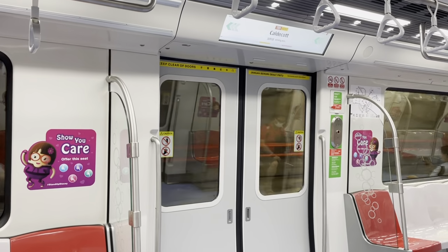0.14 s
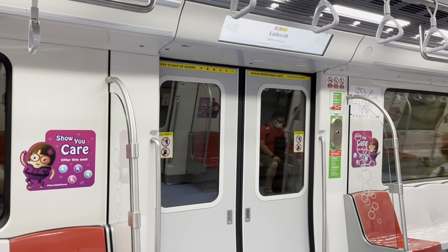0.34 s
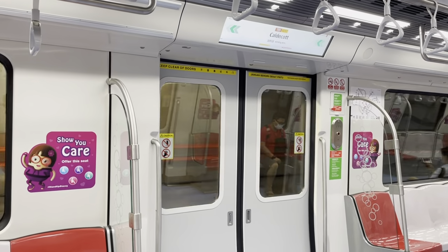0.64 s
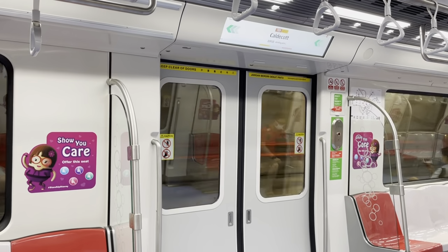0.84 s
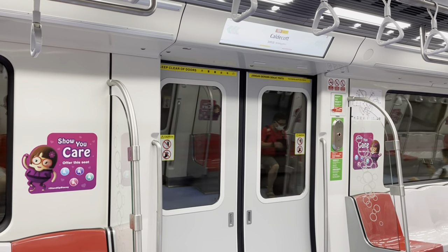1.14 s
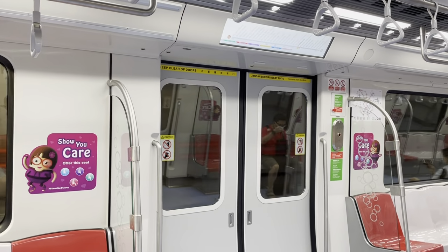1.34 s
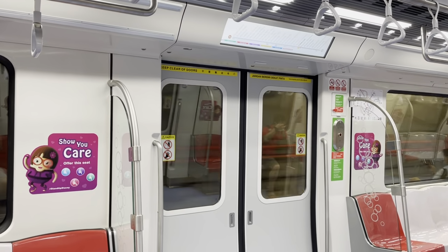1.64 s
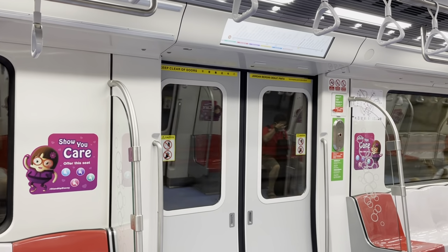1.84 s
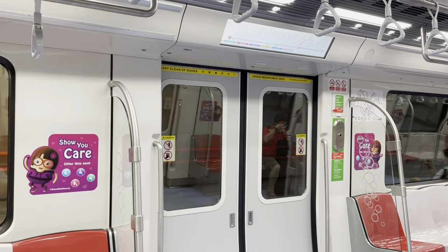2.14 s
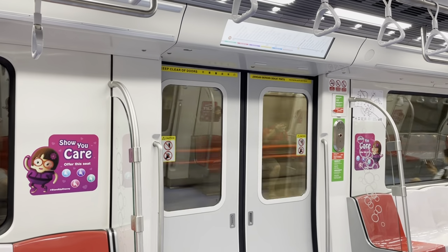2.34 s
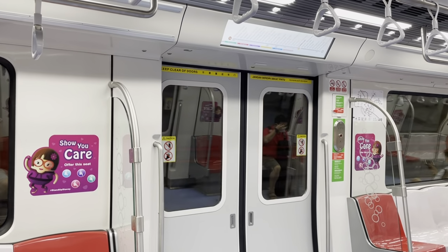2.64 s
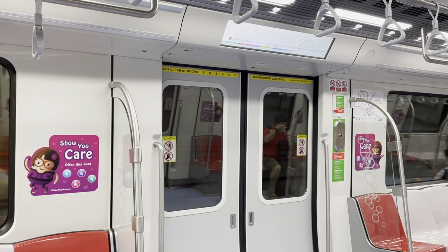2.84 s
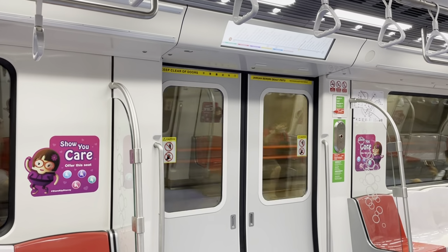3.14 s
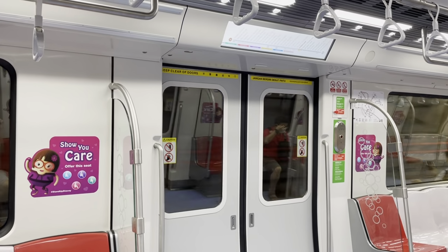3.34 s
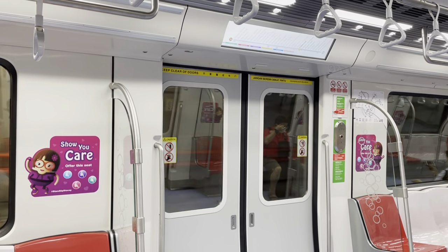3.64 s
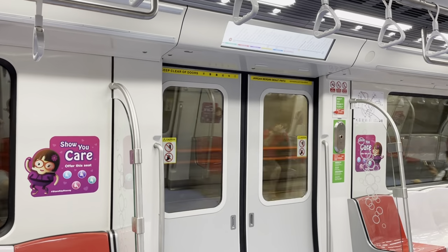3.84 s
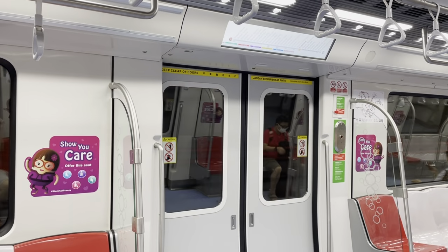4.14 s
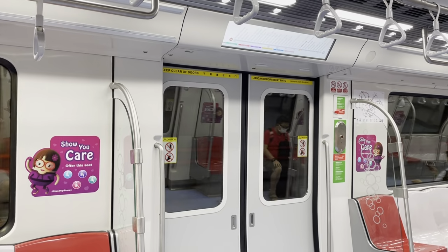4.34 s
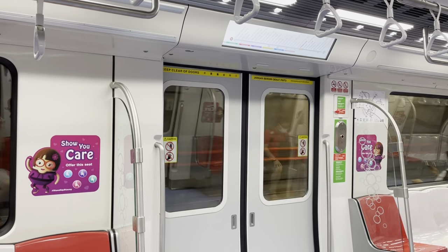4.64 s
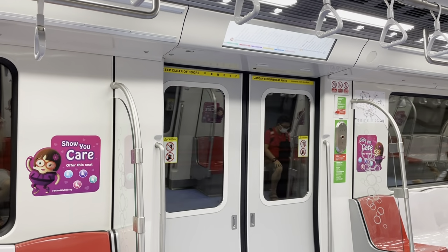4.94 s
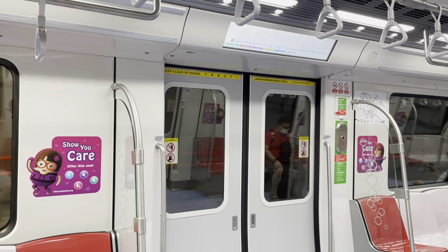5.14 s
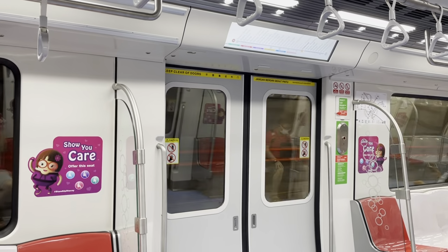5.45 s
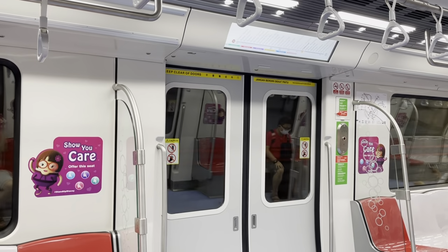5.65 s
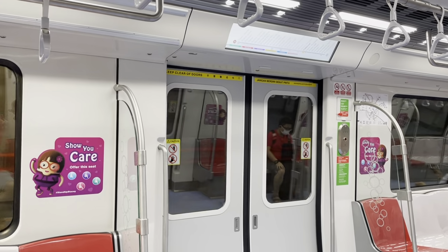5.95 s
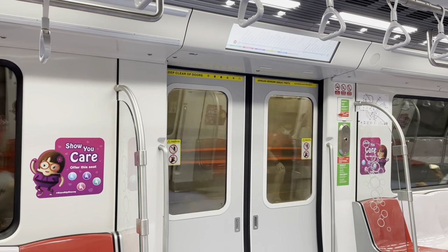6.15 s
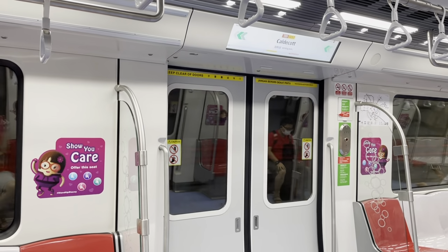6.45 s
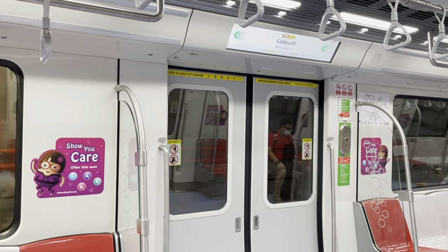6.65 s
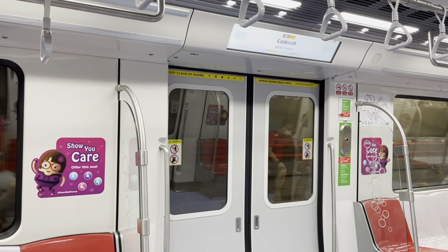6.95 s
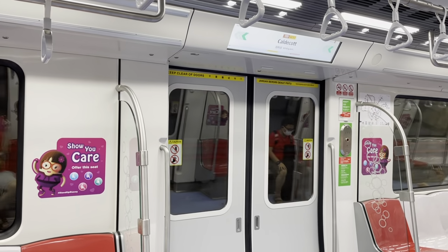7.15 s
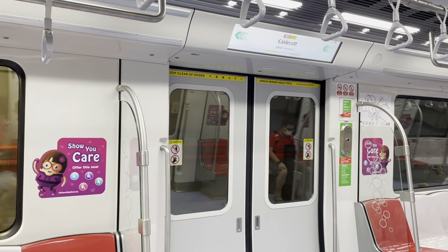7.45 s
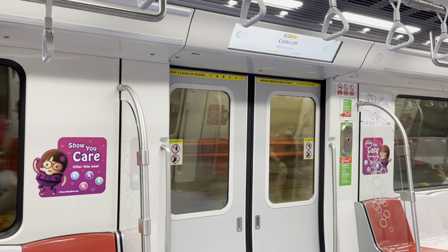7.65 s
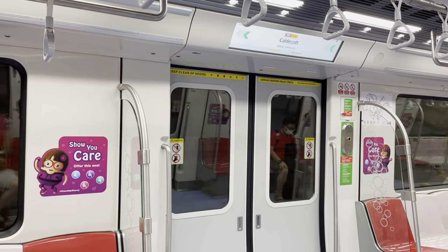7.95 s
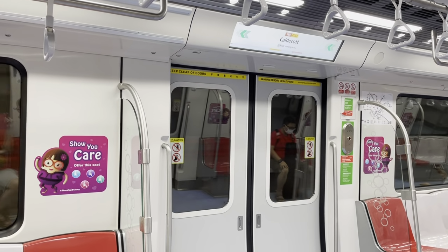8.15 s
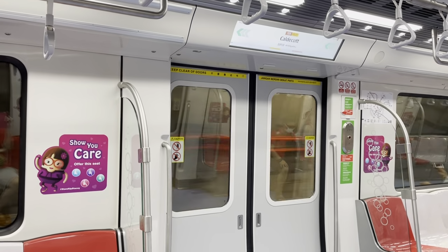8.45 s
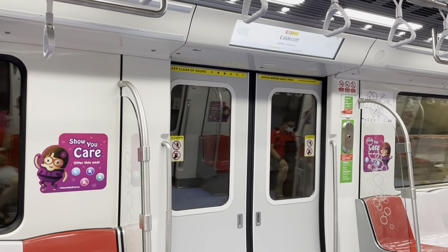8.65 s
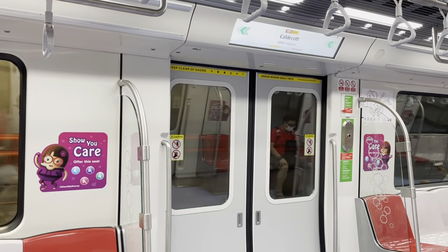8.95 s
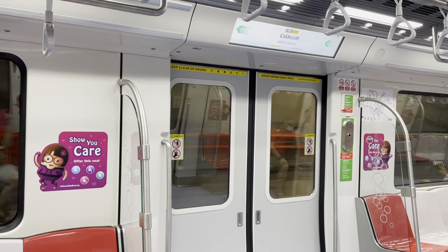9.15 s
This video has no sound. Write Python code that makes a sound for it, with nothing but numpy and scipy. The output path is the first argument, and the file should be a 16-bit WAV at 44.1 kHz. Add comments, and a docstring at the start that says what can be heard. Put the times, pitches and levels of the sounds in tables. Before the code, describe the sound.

Heard inside a metro car speeding through a tunnel, a continuous hollow rail roar dominates, with low wheel-frame rumble and body drone beneath. Soft air hisses at the door seals, and a faint high wheel ring swells now and then. Two faint air-valve puffs come before the middle. The roar eases slightly, then the floor hum swells late. Small stereo microphones in the cabin, wide and enclosed.

```python
"""Underground train ride

Inside an underground train car running at speed through a tunnel, heard by a small stereo microphone pair.
Rails roar, the bogies (wheel frames) rumble, the car body drones and the wheels ring: each is random noise
sent through resonances. Air hisses at the door seals and a valve puffs now and then: both are noise shaped
in pitch. Each sound has its own changing level.
"""
import sys
import numpy as np
from scipy import signal
from scipy.fft import rfft, irfft, next_fast_len
from scipy.io import wavfile
from scipy.ndimage import uniform_filter1d, map_coordinates

SR = 44100
rng = np.random.default_rng(int(sys.argv[2]) if len(sys.argv) > 2 else 0)


def volts_from_decibels(level):
    """Turn decibel levels (scalar or array-like) into linear amplitude factors."""
    exponent = np.asarray(level, float) / 20
    return 10 ** exponent


def unload_audio(sound):
    """Save the sound as a 16-bit wav file, at the path given as the first command line argument."""
    columns = np.transpose(np.atleast_2d(sound))
    # keep every value between -1 and 1, then stretch to whole-number steps
    steps = np.round(np.clip(columns, -1, 1) * 32767)
    wavfile.write(sys.argv[1], SR, steps.astype(np.int16))


N = 410394  # length in samples
TIME = np.arange(N) / SR  # seconds
HZ = np.fft.rfftfreq(next_fast_len(N + 8192), 1 / SR)  # pitches at which filters are given

# how loud the track runs under the wheels: (time [s], roar [dB], lowest rail band over the roar [dB])
ROAR_LEVELS = [(0, -20.5, -0.5), (.4, -22, -1.5), (1.1, -21.5, -2), (1.9, -23, -4), (2.4, -23, -1.5),
               (3.3, -24, -1.5), (4.4, -23, -3), (5.4, -24.5, -3.5), (6.5, -26, -3), (7.6, -24.5, -4.5),
               (8.3, -24, -4), (9.3, -24.5, -5)]
# how hard the floor is shaken from below: (time [s], shaking [dB])
SHAKING_LEVELS = [(0, -31), (.6, -34), (2, -34), (4, -33.5), (6.5, -34), (7.6, -31.5), (9.3, -33.5)]
# the floor panel's hum is uneven and swells late: (time [s], hum [dB])
HUM_LEVELS = [(0, -35.5), (1.5, -38), (3.2, -39), (5, -38), (7.1, -39.5), (7.8, -33.5), (8.7, -34.5),
              (9.3, -37)]

# Resonances of each part; resonant() narrows the widths, and the strengths only count within one table.
# rails, in three bands: (centre [Hz], width [Hz], strength [dB])
RAIL_LOW_MODES = [(583, 56, 2), (613, 88, -4), (668, 110, -1)]
RAIL_MID_MODES = [(761.6, 168, -1), (890, 187, -5.5)]
RAIL_HIGH_MODES = [(1032, 260, 0.29), (1258, 240, -0.7), (1401, 242, -0.8)]
# bogie: (centre [Hz], width [Hz], strength [dB])
BOGIE_MODES = [(47, 16, -7), (63, 22, -0.5), (85.8, 18, -3.5)]
# air in the cabin: (centre [Hz], width [Hz], strength [dB])
CABIN_MODES = [(116, 33, -3.5), (139.7, 22, 0.5), (163.6, 53, -4)]
# floor panel: (centre [Hz], width [Hz], strength [dB])
PANEL_MODES = [(244.6, 40, -10.5), (270.2, 21, -2)]
# low strand of the bogie that grows with the panel hum: (centre [Hz], width [Hz], strength [dB])
STRAND_MODES = [(81.3, 16, 0)]
# car body: (centre [Hz], width [Hz], strength [dB])
BODY_MODES = [(316.4, 66, -2), (407, 120, 0), (467, 127, -0.43)]
# wheel discs: (centre [Hz], width [Hz], strength [dB])
WHEEL_MODES = [(2010, 15, 2.5), (1967, 91, -2), (2148, 195, -1)]

# the wheel ring swells now and then: (middle [s], gain [dB])
WHEEL_SWELLS = [(1.1, -0.5), (3.15, 3.5), (4.2, -0.5), (5.6, 3), (6.85, 3), (8.35, 2), (9.3, 3)]
# colour of the air at the door seals: (pitch [Hz], relative level per Hz [dB])
HISS_COLOUR = [(900, -24), (1700, 6.5), (2500, 5.5), (3500, -1.5), (5300, -2.5), (6200, -11.5),
               (7500, -16.5), (9700, -24), (10500, -33.5), (11800, -37.5), (12800, -44.5), (15500, -44)]
# colour of the valve's air jet: (pitch [Hz], relative level per Hz [dB])
JET_COLOUR = [(1500, -18.5), (2800, -1.5), (5000, 2), (7500, -12), (10000, -24.5), (13000, -39),
              (15500, -35.5)]
# valve puffs: (start [s], level [dB])
VALVE_PUFFS = [(2.341, -39), (3.153, -40), (9.2, -49)]
# stereo image by pitch: (pitch [Hz], likeness [0-1], left over right [dB], left leads by [radians]); from 7700
# Hz up both sides carry nearly the same sound, in or out of step by pitch
STEREO_IMAGE = [(60, .98, -1.7, 0), (140, .96, -3.5, .2), (205, .4, -2, .2), (310, .8, 0, .4),
                (430, .35, 1.5, .4), (580, .4, 0, .6), (750, .3, 3, 2.6), (1100, .12, 1.5, 1.8),
                (1450, .2, -2, .5), (1800, .55, 0, -1), (2250, .5, 1.5, .2), (2800, .55, 4, 1),
                (4150, .55, 3.5, 0), (5300, .4, 3.5, .8), (6000, .55, 3, -.4), (6900, .65, 2, -1.5),
                (7700, .97, 0, -3), (8900, .97, 0, -3.4), (10450, .98, 0, -6.1), (12300, .98, 0, -6.5),
                (13400, .97, 0, -8), (14200, .97, 0, -9.4)]


def unit(x):
    """Scales to an rms (average strength) of 1."""
    return x / np.sqrt(np.mean(x ** 2))


def columns(rows, at, axis=lambda v: v):
    """Reads every column after the first at the given places, with straight lines between rows."""
    first, *others = np.transpose(rows)
    return [np.interp(axis(at), axis(first), column) for column in others]


def filtered(x, response):
    """Passes x through a filter given on HZ."""
    size = 2 * (len(HZ) - 1)
    return irfft(rfft(x, size) * response, size)[..., :N]


def colour(points):
    """Turns a colour table into a gain on HZ."""
    return volts_from_decibels(columns(points, HZ, axis=np.log1p)[0])


def surge(depth_db):
    """A smooth random swell in dB, like a loose hand on a volume knob."""
    surges_per_s = 2.5
    knots = rng.standard_normal(40)
    return depth_db * map_coordinates(knots, [np.minimum(TIME * surges_per_s, 39)])


def resonant(modes, steep, shell_hz):
    """Gain on HZ of separately shaken resonances (powers add), dulled by the car shell above shell_hz."""
    power = 0
    for centre, width, db in modes:
        damping = (HZ * width) ** 2
        peak = damping / ((centre ** 2 - HZ ** 2) ** 2 + damping)
        power = power + volts_from_decibels(2 * db) * peak ** steep
    return np.sqrt(power / (1 + (HZ / shell_hz) ** 6))


def rush(gain, patchy_db):
    """Two unrelated noises sharing patches of gain, as from uneven rail and passing walls; rms 1."""
    spectra = signal.stft(rng.standard_normal((2, N)), nperseg=1024)[2]
    patches = rng.standard_normal(spectra.shape[1:])
    patches = uniform_filter1d(patches, size=5, axis=0)  # smooth along pitch
    patches = uniform_filter1d(patches, size=9, axis=1)  # smooth along time
    patchy = spectra * volts_from_decibels(patchy_db * unit(patches))
    pair = signal.istft(patchy, nperseg=1024)[1][:, :N]
    return unit(filtered(pair, gain))


def shaken(bodies, levels, steep, shell_hz, patchy_db):
    """Noise rings in each set of resonances at its own changing level."""
    return sum(volts_from_decibels(db) * rush(resonant(modes, steep, shell_hz), patchy_db)
               for modes, db in zip(bodies, levels))


def rails():
    """Rolling wheels make the rails roar in three bands of resonances."""
    high_db, high_fades_db_per_s = -6, 0.03  # high band over the roar, and its slow fade
    roar_db, low_db = columns(ROAR_LEVELS, TIME)
    levels = [roar_db + low_db + surge(0.3),
              roar_db,
              roar_db + high_db - high_fades_db_per_s * TIME]
    bands = [RAIL_LOW_MODES, RAIL_MID_MODES, RAIL_HIGH_MODES]
    return shaken(bands, levels, steep=1.56, shell_hz=3500, patchy_db=1.34)


def underfloor():
    """Rail roughness shakes the bogie, the air in the cabin, a floor panel and the car body."""
    bogie_db, cabin_db, body_db = -0.5, -1, 1.5  # over the shaking
    strand_db = -3.5  # over the hum
    shaking_db, = columns(SHAKING_LEVELS, TIME)
    hum_db, = columns(HUM_LEVELS, TIME)
    levels = [shaking_db + bogie_db + surge(0.5),
              shaking_db + cabin_db + surge(0.1),
              hum_db + surge(-0.5),
              hum_db + strand_db,
              shaking_db + body_db + surge(1.4)]
    bodies = [BOGIE_MODES, CABIN_MODES, PANEL_MODES, STRAND_MODES, BODY_MODES]
    return shaken(bodies, levels, steep=1.54, shell_hz=1500, patchy_db=0.52)


def wheels():
    """Wheel discs ring in swelling patches, following the roar a little."""
    mean_db, follows = -36.5, 0.26  # mean level before the swells, share of the roar's ups and downs
    swell_s = 0.29  # from the middle of a swell until its dB gain is down to 37 %
    roar_db, _ = columns(ROAR_LEVELS, TIME)
    ring_db = mean_db + follows * (roar_db - roar_db.mean()) + surge(-0.5)
    for middle, gain_db in WHEEL_SWELLS:
        ring_db = ring_db + gain_db * np.exp(-((TIME - middle) / swell_s) ** 2)
    return shaken([WHEEL_MODES], [ring_db], steep=1.45, shell_hz=3600, patchy_db=2.0)


def door_hiss():
    """Tunnel air hisses past the door seals, rising and falling with the roar."""
    hiss_db, fades_db_per_s = -12.5, 0.11  # over the roar, and its slow fade
    roar_db, _ = columns(ROAR_LEVELS, TIME)
    level_db = roar_db + hiss_db - fades_db_per_s * TIME
    return volts_from_decibels(level_db) * rush(colour(HISS_COLOUR), patchy_db=0.93)


def valve():
    """A jet of air: each puff opens, holds and dies away down the tunnel."""
    rise_s, hold_s = 0.02, 0.08
    t60_s = 0.93  # time to fade by 60 dB
    flow = np.zeros(N)
    for start, level_db in VALVE_PUFFS:
        since = TIME - start
        opening = np.clip(since / rise_s, 0, 1)
        fade_db = 60 * np.clip(since - rise_s - hold_s, 0, None) / t60_s
        flow += opening * volts_from_decibels(level_db - fade_db)
    return flow * rush(colour(JET_COLOUR), patchy_db=-2.5)


def scene():
    """Two sound fields in the car: one reaches both ports alike, the other opposed."""
    return rails() + underfloor() + wheels() + door_hiss() + valve()


def top_cut(x):
    """Nothing passes above the cut-off."""
    return signal.sosfilt(signal.butter(12, 15720, fs=SR, output="sos"), x)


def record(dry):
    """Two microphone ports share part of the sound, each with its own shading and delay below about 7.7 kHz.
    Higher up, the treble sounds nearly the same on both sides, in or out of step by pitch."""
    alike, tilt_db, lead = columns(STEREO_IMAGE, HZ, axis=np.log1p)
    turn = np.arccos(np.clip(alike, 0, 1)) / 2  # more turn, more of the opposed field
    shared, opposed = filtered(dry, np.array([np.cos(turn), np.sin(turn)]))
    both = np.array([shared + opposed, shared - opposed])
    left = volts_from_decibels(tilt_db / 2) * np.exp(0.5j * lead)  # half the difference; the right gets the inverse
    ports = filtered(both, np.array([left, 1 / left]))
    return top_cut(ports)


dry = scene()
out = record(dry)
unload_audio(out)
```